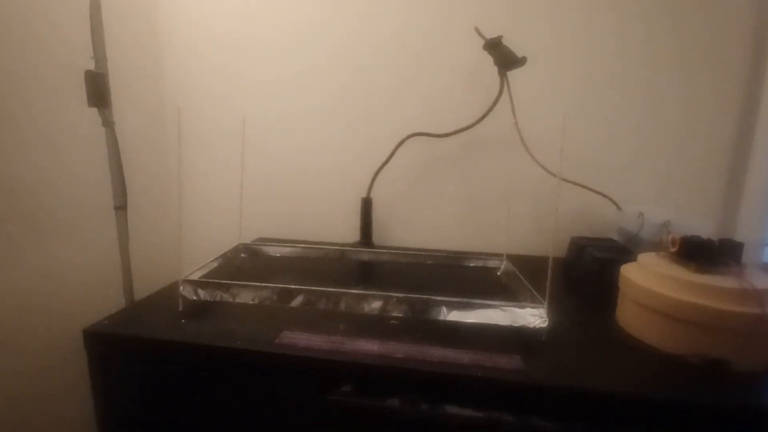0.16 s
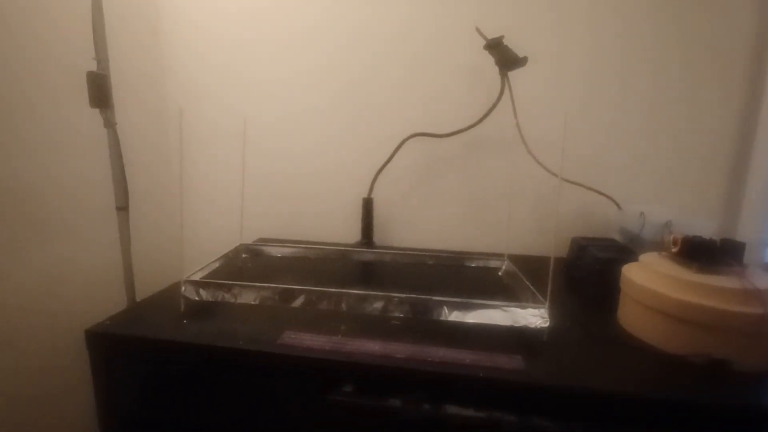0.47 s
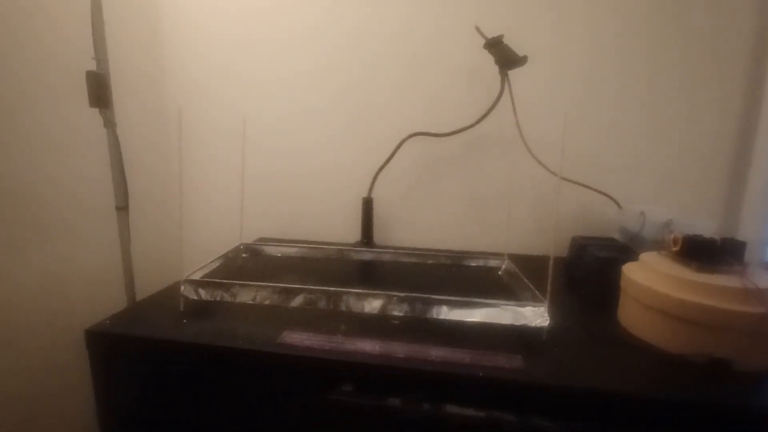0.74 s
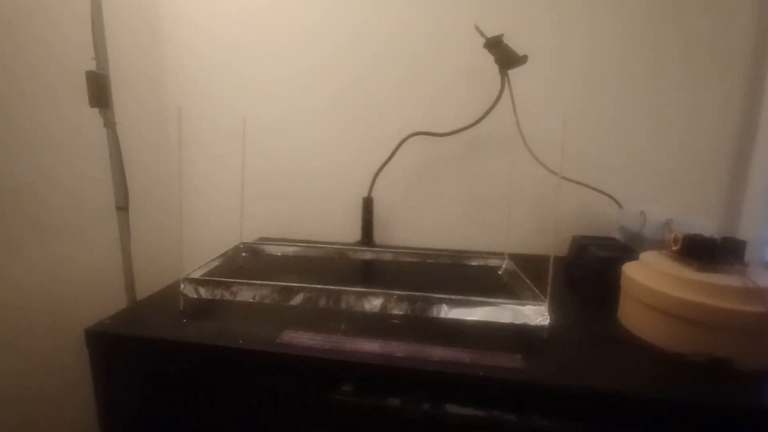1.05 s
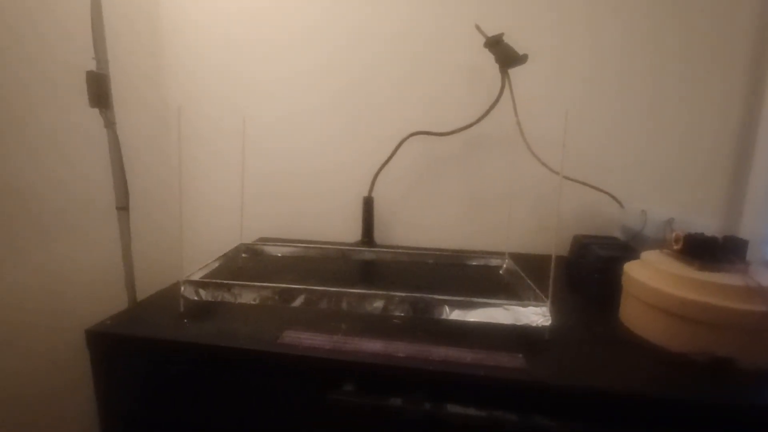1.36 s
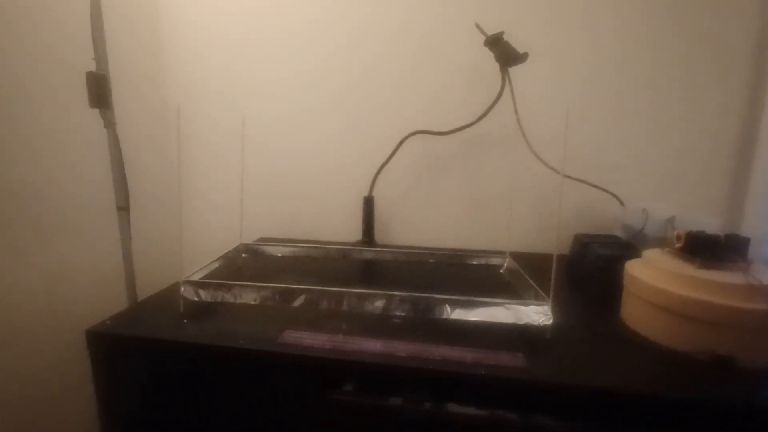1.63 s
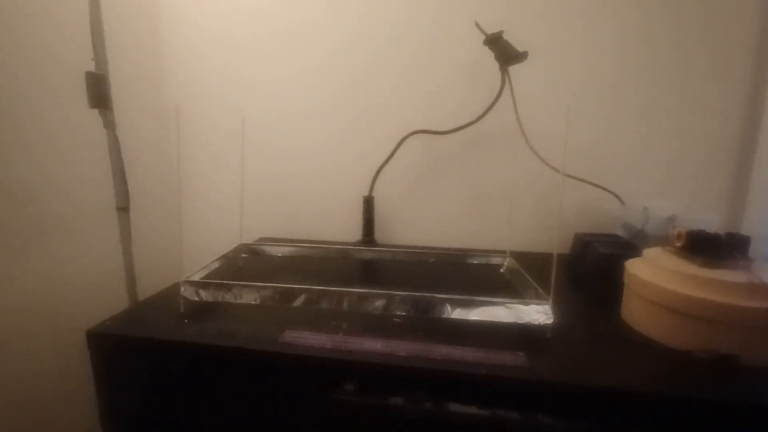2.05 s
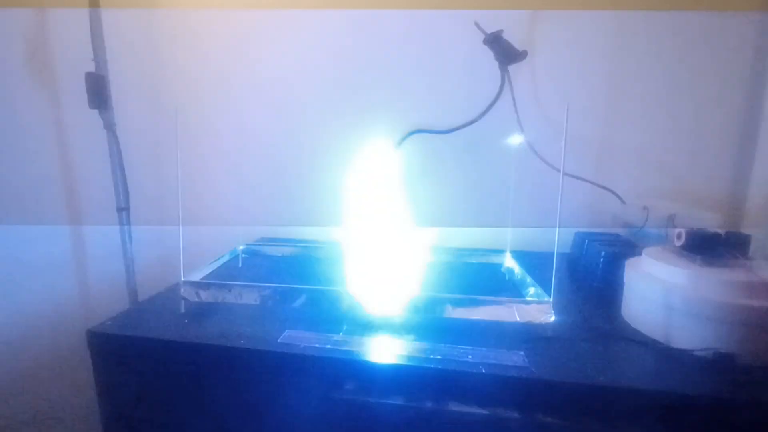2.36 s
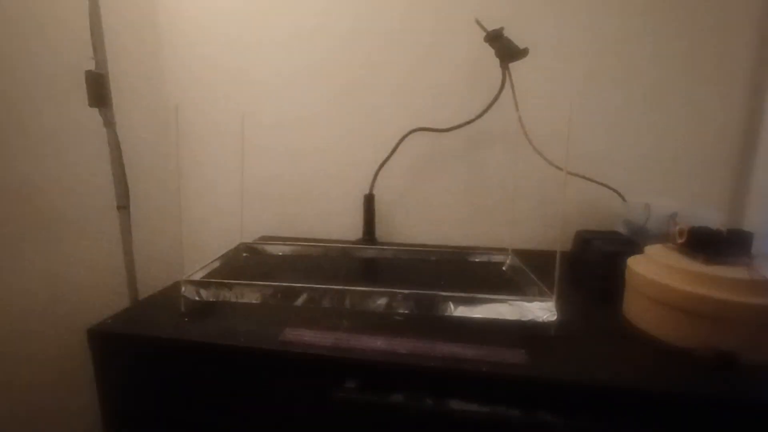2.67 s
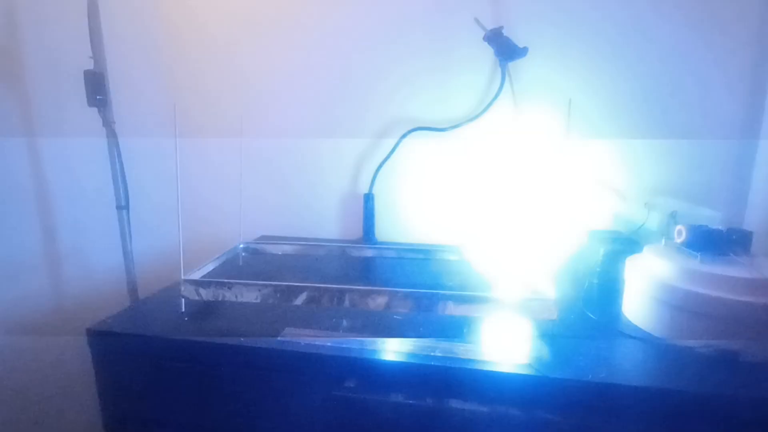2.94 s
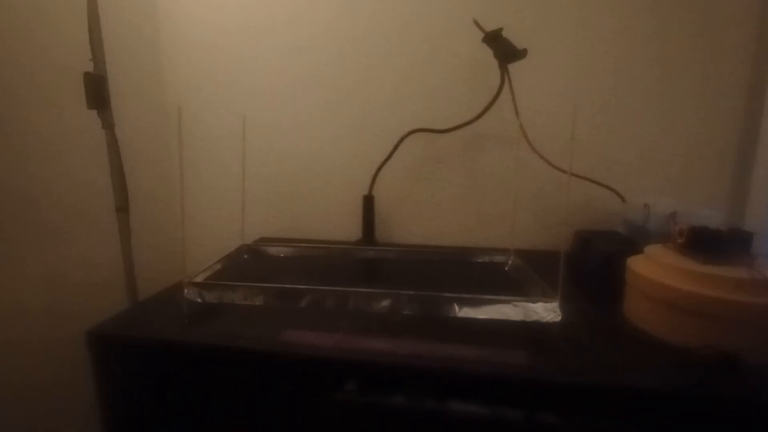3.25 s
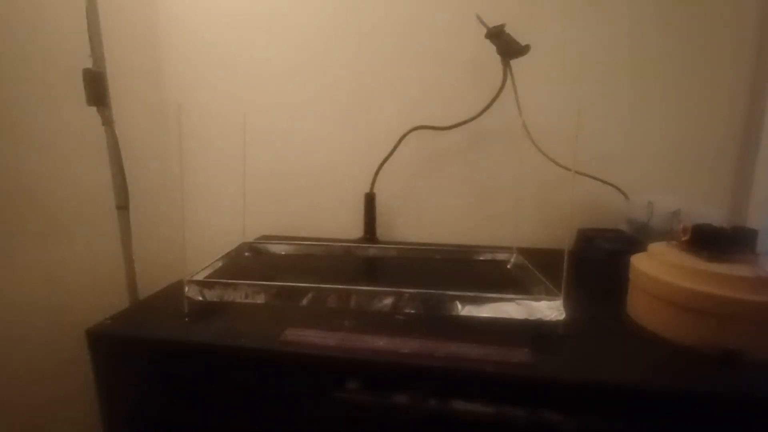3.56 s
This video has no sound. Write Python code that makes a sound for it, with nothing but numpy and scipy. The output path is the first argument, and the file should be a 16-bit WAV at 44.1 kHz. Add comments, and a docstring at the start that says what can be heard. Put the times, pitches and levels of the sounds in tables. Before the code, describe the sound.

High-voltage electric discharge close to the microphone in a small reverberant room over faint dull noise. Surges at 0.1, 0.75, 1.0, 1.4 and 2.15 s: sharp tick, brief hiss with low sinking tone, fast thin buzz slowing to separate ticks. Hollow pops and sputtering fizz follow the later four, growing stronger. A hard crack at 2.4 s; at 3.0 s an enormous bang booms, distorts and rings away, leaving quieted, thinning ticks.

```python
"""A pointed electrode on a table in a small bare room is charged by a high-voltage supply.
Each surge is a tick and filtered-noise hiss, with low sine tones that sink in pitch under the hiss.
Corona pulses then thin out as the charge leaks away; noise spits make sparks pop and streamers fizz.
Twice the gap breaks down fully: one huge pulse rings the room, overloads the microphone into rumble
and boom, and pulls the gain down. The gain does not come back but keeps creeping lower."""
import sys
import numpy as np
from scipy import signal
from scipy.fft import rfft, irfft
from scipy.io import wavfile
from scipy.ndimage import uniform_filter1d

SR = 44100
rng = np.random.default_rng(int(sys.argv[2]) if len(sys.argv) > 2 else 0)


def master_out(mix):
    """Clip the mix to full scale and print it as 16-bit PCM to the path in sys.argv[1]."""
    frames = np.transpose(np.atleast_2d(mix))
    ceiling = np.clip(frames, -1, 1)
    pcm = np.round(ceiling * 32767).astype(np.int16)
    wavfile.write(sys.argv[1], SR, pcm)


N = 163170  # length in samples


def undb(db):
    """Decibels to gain."""
    return 10 ** (np.asarray(db) / 20)


def pan(db):
    """Left and right gains for a level difference; positive leans left."""
    return undb(np.array([[db], [-db]]) / 2)


def colour(x, points):
    """Causal minimum-phase filter through (Hz, dB) points, with rounded corners."""
    size = 2 ** 18
    hz, db = np.array(points).T
    f = np.maximum(np.arange(size // 2 + 1) * SR / size, 1)
    curve_db = np.interp(np.log(f), np.log(hz), db)
    cepstrum = irfft(np.log(undb(curve_db)))
    # folding the cepstrum makes it causal; the 30 ms taper rounds the corners
    cepstrum[1:] *= 2 * np.exp(-(np.arange(1, size) / SR / .03) ** 2)
    response = np.exp(rfft(cepstrum))
    return irfft(rfft(x, size) * response)[..., :N]


def clicks(times, dbs):
    """Single-sample pulses at given times and levels."""
    out = np.zeros(N)
    index = np.round(np.asarray(times) * SR).astype(int)
    np.add.at(out, np.clip(index, 0, N - 1), undb(dbs))
    return out


def burst(start, length, attack, release):
    """Envelope with linear attack, hold and exponential release; times in seconds."""
    age = np.arange(N) / SR - start
    return np.clip(age / attack, 0, 1) * np.exp(-np.maximum(age - length, 0) / release)


def spit(start, release):
    """A tight cluster of tiny discharges: noise that dies away at once."""
    shape = burst(start, 0, attack=0.00042, release=release)
    x = shape * rng.standard_normal(N)
    return x * np.sqrt(np.sum(shape ** 2) / np.sum(x ** 2))


def uneven_noise(spread_db):
    """Noise whose grains vary in size by a spread in dB, scaled to rms 1."""
    x = rng.standard_normal(N) * undb(spread_db * rng.standard_normal(N))
    return x / x.std()


def crackle():
    """Dense micro-discharges of uneven size."""
    return uneven_noise(spread_db=3)


# Room decay. Each row: frequency in Hz, t60 in seconds.
ROOM_DECAY = [(60, 0.3), (400, 0.42), (1000, 0.42), (2000, 0.4997), (7000, 0.5164), (11000, 0.4386),
              (16000, 0.3856)]
# Lingering room modes. Each row: frequency in Hz, level against the diffuse tail in dB, t60 in seconds.
ROOM_MODES = [(221, -23, .5), (813, -27, .52), (1217, -32, .6)]
ROOM_BUILD_S = .001
NEAR_WALLS_DB, NEAR_WALLS_S = 4.5, .004  # extra early energy


def room_response():
    """A diffuse tail, strongest early, with its own decay in each band, plus lingering modes."""
    t = np.arange(SR) / SR
    hz, t60 = np.array(ROOM_DECAY).T
    noise = rfft(rng.standard_normal((2, SR)))
    log_f = np.log(np.maximum(np.arange(noise.shape[1]), 1))
    tail = 0
    for band, decay in zip(np.eye(len(hz)), t60):
        share = np.interp(log_f, np.log(hz), band)  # overlapping triangular bands
        tail = tail + irfft(noise * share, SR) * np.exp(-np.log(1000) * t / decay)
    tail = tail * (1 - np.exp(-t / ROOM_BUILD_S))
    tail = tail * (1 + undb(NEAR_WALLS_DB) * np.exp(-t / NEAR_WALLS_S))
    tail = tail / np.sqrt(np.sum(tail ** 2) / 2)
    phases = rng.uniform(0, 2 * np.pi, (len(ROOM_MODES), 2, 1))
    for (mode_hz, db, decay), phase in zip(ROOM_MODES, phases):
        ring = np.sin(2 * np.pi * mode_hz * t + phase) * np.exp(-np.log(1000) * t / decay)
        tail = tail + undb(db) * ring / np.sqrt(np.sum(ring ** 2) / 2)
    return tail


EAR_LAG_S = .00012


def place(x, room, pan_db, wet_db, wet_pan_db):
    """Direct sound, slightly later on the left, plus the room."""
    direct = np.array([np.roll(x, int(EAR_LAG_S * SR)), x]) * pan(pan_db)
    reverb = signal.fftconvolve(x[None], room, axes=1)[:, :N]
    return direct + undb(wet_db) * pan(wet_pan_db) * reverb


# Colour of the room noise. Each row: frequency in Hz, gain in dB.
FLOOR = [(30, -9), (80, 5), (110, 11), (150, 3.5), (215, 3), (320, -14.5), (800, -7), (1500, -19.5),
         (4000, -29.5), (16000, -25)]
FLOOR_DB = -56.5  # before colouring and panning
HUM_HZ, HUM_WIDTH_HZ, HUM_DB = 220.6, 24, -70  # level before panning


def background():
    """Dull, partly shared room noise, and narrow-band noise as a wavering hum once the supply is on."""
    air = rng.standard_normal((2, N)) + rng.standard_normal(N)
    hum = signal.lfilter(*signal.iirpeak(HUM_HZ, HUM_HZ / HUM_WIDTH_HZ, fs=SR), rng.standard_normal(N))
    on = np.arange(N) / SR > SURGES[0][0]
    air = undb(FLOOR_DB) * colour(air, FLOOR) / np.sqrt(2)
    hum = undb(HUM_DB) * on * hum / hum.std()
    return (air + hum) * pan(db=5)


# Voltage surges, levels before colouring. Each row: start in seconds, hiss level in dB,
# hiss length in seconds, tick delay in seconds, tick level in dB, first corona pulse level in dB.
SURGES = [(0.1055, -41, 0.018, 0.0044, -21, -24.5), (0.751, -38, 0.073, 0.0085, -21, -24),
          (1.0347, -38.5, 0.091, 0.0032, -17, -22.5), (1.435, -35, 0.083, 0.00474, -16, -21.5),
          (2.154, -35, 0.05, 0.0069, -21, -20)]
# Colours of the hiss and the tick. Each row: frequency in Hz, gain in dB.
HISS = [(40, -14.5), (70, -3.5), (140, -3.5), (222, 6), (300, 1.5), (470, -1), (640, 1), (900, -1),
        (1150, -3), (1600, -6), (2500, -2.5), (3600, -5), (7000, -5.5), (11000, -12.5), (15000, -4)]
TICK = [(100, -23.5), (1500, -6), (2500, 6), (3500, -1), (7000, 1.5), (11500, 8), (16000, -2.5)]
HISS_RELEASE_S, TICK_RELEASE_S = 0.059, 0.00057


def surges(room):
    """A sharp tick and a short rush of micro-discharge hiss as the voltage jumps."""
    swell, ticks = 0, 0
    for start, hiss_db, length, delay, tick_db, _ in SURGES:
        swell = swell + undb(hiss_db) * burst(start, length, attack=0.0013, release=HISS_RELEASE_S)
        ticks = ticks + undb(tick_db) * spit(start + delay, TICK_RELEASE_S)
    hiss = place(colour(swell * crackle(), HISS), room, pan_db=-1.0, wet_db=2.0, wet_pan_db=5)
    return hiss + place(colour(ticks, TICK), room, pan_db=15.5, wet_db=6.0, wet_pan_db=3.0)


# Low tones under each surge's hiss. Each row: frequency in Hz before detuning,
# level against the surge's hiss level in dB, rise in seconds, time from start to release in seconds,
# t60 in seconds, share by which the pitch sinks.
SINKING_TONES = [(140.4, -14, 0.027, 0.082, 0.45, 0.082), (228.4, -7, 0.02, 0.045, 0.28, 0.015),
                 (391, -12, 0.0041, 0.0099, 0.068, .3), (665, -10.5, 0.011, 0.014, 0.14, 0.18)]
SINK_S, DETUNE = .06, 0.013  # sink time constant; random detuning as a share of the pitch
RIGHT_LEAD_RAD = 0.38  # right channel ahead in phase


def sinking_tones():
    """Low sine tones under each surge's hiss: upper ones speak first and sink most, low ones swell."""
    out = np.zeros((2, N))
    all_detunes = rng.standard_normal((len(SURGES), len(SINKING_TONES)))
    for (start, db, *_), detunes in zip(SURGES, all_detunes):
        age = np.maximum(np.arange(N) / SR - start, 0)
        for (hz, tone_db, rise, hold, t60, sink), detune in zip(SINKING_TONES, detunes):
            sinking = 1 - sink * (1 - np.exp(-age / SINK_S))
            pitch = hz * (1 + DETUNE * detune) * sinking
            phase = 2 * np.pi * np.cumsum(pitch) / SR + np.array([[0], [RIGHT_LEAD_RAD]])
            swell = burst(start, hold, attack=rise, release=t60 / np.log(1000))
            out += undb(db + tone_db) * swell * np.sin(phase)
    return out * pan(db=1)


# Colour of the corona pulses. Each row: frequency in Hz, gain in dB.
CORONA = [(100, -31), (3500, -34.5), (6000, -18.5), (9500, -14), (12000, -9), (14500, 5), (16000, 0)]
CORONA_RATE_HZ, LEAK_S, LEAK_POWER = 850, .25, 2.04  # rate at full charge, and how it slows
CORONA_JITTER = .05  # random spread of the log gap between pulses
CORONA_SAG_DB_PER_S = 14.5


def corona(room):
    """Thin pulses from the point, slower and weaker as the charge leaks away."""
    charges = [(row[0], row[-1]) for row in SURGES] + [(start, db) for start, _, db, _ in BANGS]
    ends = [start for start, _ in charges[1:]] + [N / SR]
    times, dbs = [], []
    for (start, db), end in zip(charges, ends):
        age = 0
        for gap, size in rng.standard_normal((600, 2)):
            slowing = (1 + age / LEAK_S) ** LEAK_POWER
            age += slowing / CORONA_RATE_HZ * np.exp(CORONA_JITTER * gap)
            if start + age >= end:
                break
            times.append(start + age)
            dbs.append(db - CORONA_SAG_DB_PER_S * age + 0.71 * size)
    return place(colour(clicks(times, dbs), CORONA), room, pan_db=20.5, wet_db=0.0, wet_pan_db=-1)


# Colour of the fine corona hiss. Each row: frequency in Hz, gain in dB.
CORONA_HISS = [(100, -30), (3500, -18.5), (6000, -11), (9000, -5.5), (15000, -2.5)]
CORONA_HISS_DB, CORONA_HISS_FADE_S = -51, 0.38  # level before colouring


def corona_hiss(room):
    """A fine hiss of micro-discharges around the point that fades with the charge."""
    swells = [burst(row[0], 0, attack=.01, release=CORONA_HISS_FADE_S) for row in SURGES]
    charge = np.max(swells, axis=0)
    hiss = colour(undb(CORONA_HISS_DB) * charge * crackle(), CORONA_HISS)
    return place(hiss, room, pan_db=12.5, wet_db=6.5, wet_pan_db=0.5)


# Small sparks. Each row: start in seconds, relative level in dB.
POPS = [(.802, -25), (0.8354, -14.5), (1.0944, -22), (1.1141, -16.5), (1.1346, -23), (1.140, -13),
        (1.505, -16), (1.523, -15.5), (1.542, -22), (1.581, -17), (2.2518, -9.5), (2.2552, -18),
        (2.2663, -12), (2.2798, -13.5), (2.3145, -24), (2.341, -16)]
# Streamers. Each row: start in seconds, length in seconds, level before colouring in dB, extra treble in dB.
STREAMERS = [(0.827, 0.022, -33.5, -0.5), (1.108, 0.054, -33, 0.5), (1.516, 0.033, -30.5, 1),
             (2.253, 0.041, -26, 5.5), (2.311, 0.034, -31.5, -4)]
# Colours of the pops and the fizz. Each row: frequency in Hz, gain in dB.
POP = [(100, -29), (500, -14.5), (850, 2.5), (1250, -1), (1800, 1.5), (2400, 1), (3000, -3.5),
       (4200, -25.5), (8000, -37), (16000, -40)]
FIZZ = [(40, -37.5), (220, 2), (700, -9), (2000, -2.5), (9000, -3), (13000, -2), (16000, -5)]
POP_PULSE_DB, POP_SPIT_DB, POP_RELEASE_S = 16.5, -4, 0.0063
SPUTTER_DB, FIZZ_RELEASE_S = 2, 0.014


def small_sparks(room):
    """Hollow pops, each a hard pulse with a short spit, and streamers that fizz and sputter."""
    swells = [undb(db) * burst(start, length, attack=0.0033, release=FIZZ_RELEASE_S)
              for start, length, db, _ in STREAMERS]
    sputter = sum(swells) * uneven_noise(spread_db=8.5)
    pulses = clicks(*np.array(POPS).T)
    spits = sum(undb(db) * spit(start, POP_RELEASE_S) for start, db in POPS)
    pops = undb(POP_PULSE_DB) * pulses + undb(POP_SPIT_DB) * spits
    pops = colour(pops + undb(SPUTTER_DB) * sputter, POP)
    grains = crackle()
    fizz = 0
    for swell, (*_, treble_db) in zip(swells, STREAMERS):
        fizz = fizz + colour(swell * grains, [(6000, 0.0071), (12000, treble_db)])
    fizz = place(colour(fizz, FIZZ), room, pan_db=16, wet_db=3, wet_pan_db=0.0)
    return place(pops, room, pan_db=8, wet_db=-6.0, wet_pan_db=7) + fizz


# Full breakdowns. Each row: start in seconds, pulse level before filtering in dB,
# first corona pulse level afterwards in dB, bass corner in Hz.
BANGS = [(2.3954, 51, -21.5, 454), (2.986, 70, -17, 90.1)]
# Colour of the bang. Each row: frequency in Hz, gain in dB.
BANG = [(40, -20), (110, -0.5), (250, 0), (500, -7), (1000, -5), (2200, 1.5), (12000, 1), (16000, -2.5)]


def breakdowns(room):
    """One huge pulse across the gap sets the whole room ringing; the bigger spark reaches deeper."""
    pulses = 0
    for start, db, _, corner_hz in BANGS:
        high_pass = signal.butter(1, corner_hz, "high", fs=SR)
        pulses = pulses + signal.lfilter(*high_pass, clicks([start], [db]))
    return place(colour(pulses, BANG), room, pan_db=-1.0, wet_db=1, wet_pan_db=2.5)


def scene():
    """All discharges in one room, over the background."""
    room = room_response()
    charging = surges(room) + sinking_tones() + corona(room) + corona_hiss(room)
    return charging + small_sparks(room) + breakdowns(room) + background()


def meter(x, window_s):
    """Running level of both channels in dB, over a centred window."""
    power = uniform_filter1d(np.mean(x ** 2, axis=0), max(int(window_s * SR), 1))
    return 10 * np.log10(np.maximum(power, 1e-12))


# Colours of the overloaded microphone's rumble and boom. Each row: frequency in Hz, gain in dB.
RUMBLE = [(30, -17.5), (70, 6.5), (280, 12.5), (600, 7), (1200, 3.5), (6000, -6), (10000, -0.5), (16000, 4)]
BOOM = [(30, -16.5), (78, 7.5), (110, 25), (160, 1), (230, 9.5), (300, -2), (1000, 5), (3000, -9)]
CLIP_DB, CLIP_KNEE = 5, 1.36  # soft ceiling and the hardness of its bend
OVERLOAD_DB, CHOKE_S, CHOKE_DB = 11, 0.0056, -2.5  # choking threshold, meter window, level change
RUMBLE_DB, RUMBLE_PAN_DB = 1, -8.5
RUMBLE_FLICKER_S, RUMBLE_FLICKER_DB = .004, 1.5
PUNCH_S, PUNCH_DB = 0.0062, -3.5  # extra rumble at each choke
KICK_DB, BOOM_PAN_DB = 23.5, -5.5


def overload(x):
    """The microphone saturates softly; past its limit it chokes, folds into rumble, and booms."""
    excess = meter(x, CHOKE_S) - OVERLOAD_DB
    choked = .5 + .5 * np.tanh(excess / 2.0)  # 0 free, 1 fully choked
    drive = x / undb(CLIP_DB)
    rounded = drive / (1 + np.abs(drive) ** CLIP_KNEE) ** (1 / CLIP_KNEE)
    flicker = uniform_filter1d(rng.standard_normal(N), int(RUMBLE_FLICKER_S * SR))
    uneven = undb(RUMBLE_FLICKER_DB * flicker / flicker.std())
    folded = choked * np.sin(np.pi * drive) * uneven
    # each onset of choking kicks; half a window's delay offsets the centred meter
    kick = np.roll(np.maximum(np.diff(choked, prepend=0), 0), int(CHOKE_S * SR / 2))
    punch = signal.lfilter([1], [1, -np.exp(-1 / (PUNCH_S * SR))], kick)
    rumble = colour(folded * (1 + undb(PUNCH_DB) * punch), RUMBLE)
    shock = np.maximum.accumulate(np.maximum(excess, 0))  # hardest blow so far
    boom = colour((shock / shock.max()) ** 2 * (folded + undb(KICK_DB) * kick), BOOM)
    saturated = undb(CLIP_DB + CHOKE_DB * choked) * rounded
    return saturated + undb(RUMBLE_DB) * pan(RUMBLE_PAN_DB) * rumble + pan(BOOM_PAN_DB) * boom


# Microphone colour. Each row: frequency in Hz, gain in dB.
MIC = [(25, -26), (55, -0.5), (6000, 0), (7000, -5.5), (8000, -12), (9500, -6), (12500, 1.5), (16000, -2.5)]
# Right microphone port against the left. Each row: frequency in Hz, gain in dB.
RIGHT_PORT = [(100, 0.5), (8000, 0.5), (13000, -0.5)]
GAIN_TOP_DB, GAIN_RATIO = -13.5, 8  # threshold and compression ratio
GAIN_RANGE_DB = 16  # limit of the level-driven cut, before the creep
GAIN_CREEP_DB_PER_S = 0.5  # between louder peaks the cut deepens at this pace
GAIN_LOOKAHEAD_S, GAIN_RAMP_S = 0.01, 0.0049
TOP_HZ = 15900


def record(dry):
    """Overload, microphone colour, gain control that ducks early and creeps lower, and the top cut."""
    left, right = colour(overload(dry), MIC)
    x = np.array([left, colour(right, RIGHT_PORT)])
    t = np.arange(N) / SR
    creep = GAIN_CREEP_DB_PER_S * t
    over_db = meter(x, window_s=0.002) - GAIN_TOP_DB
    wanted = np.clip(over_db * (1 - 1 / GAIN_RATIO), 0, GAIN_RANGE_DB)
    held = np.maximum.accumulate(wanted - creep) + creep
    duck = uniform_filter1d(held, max(int(GAIN_RAMP_S * SR), 1))
    x = x * undb(-np.interp(t + GAIN_LOOKAHEAD_S, t, duck))
    top_cut = signal.ellip(10, .2, 70, TOP_HZ, fs=SR, output="sos")
    return signal.sosfilt(top_cut, np.clip(x, -1, 1))


dry = scene()
out = record(dry)
master_out(out)
```